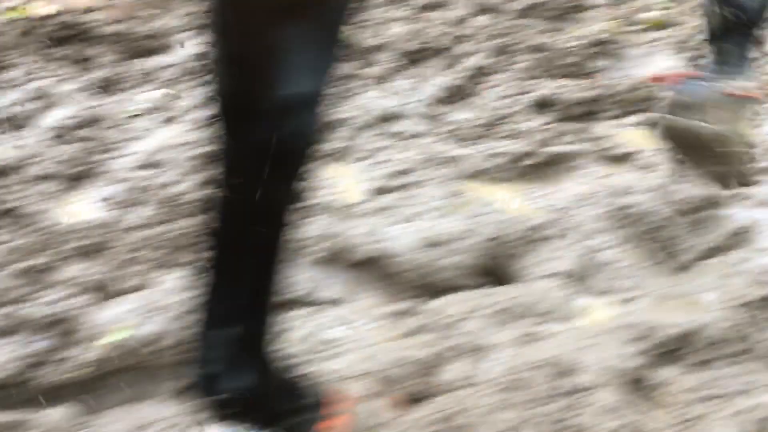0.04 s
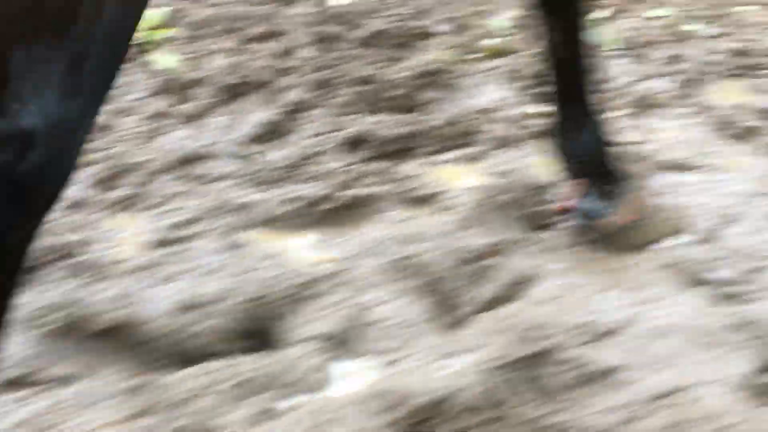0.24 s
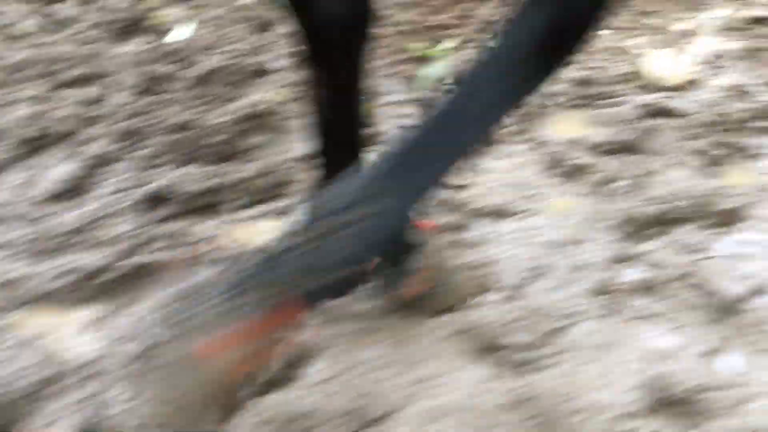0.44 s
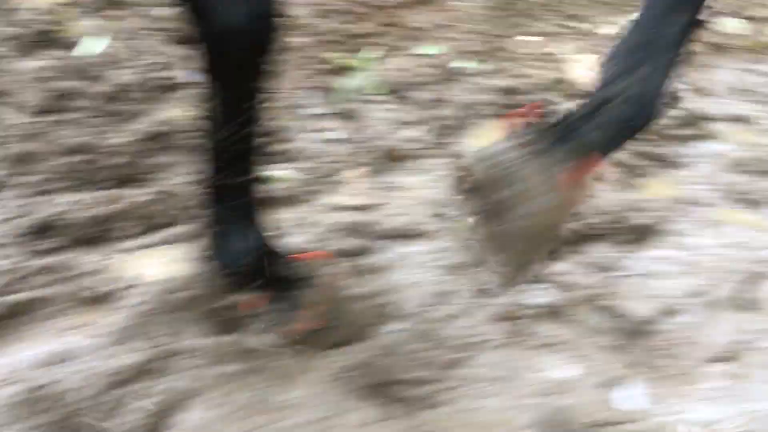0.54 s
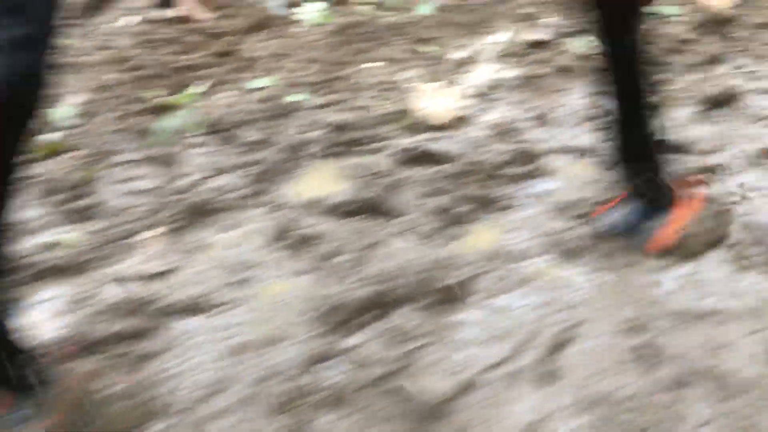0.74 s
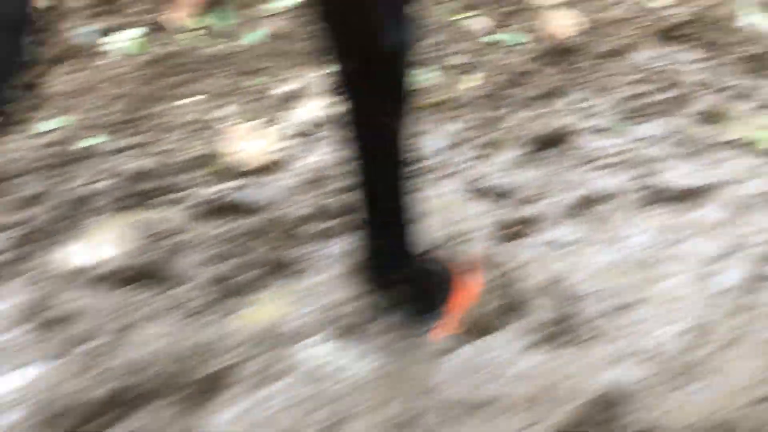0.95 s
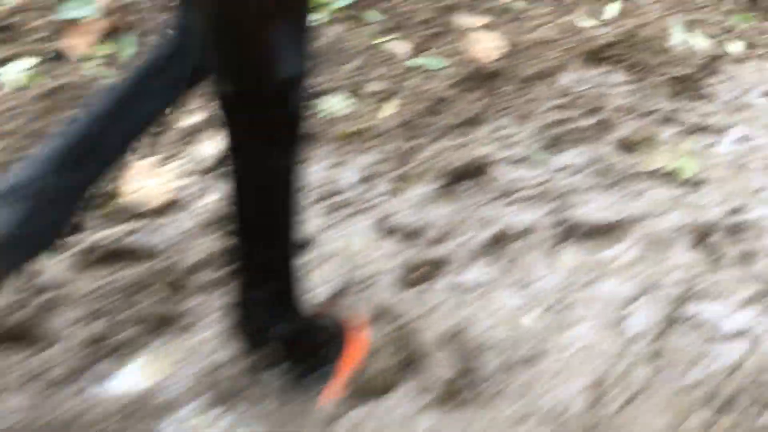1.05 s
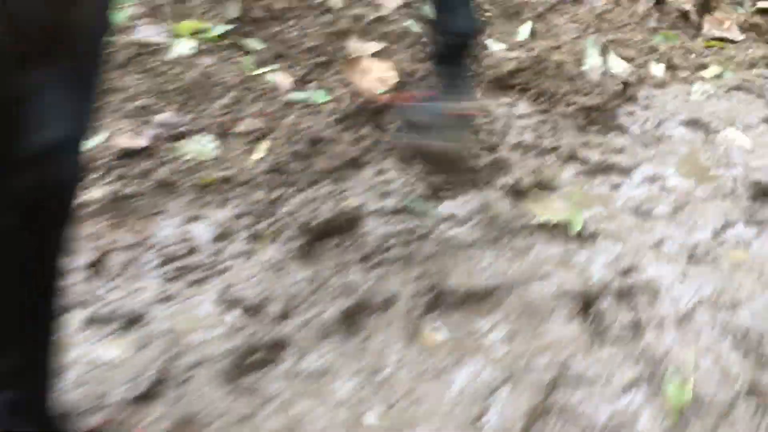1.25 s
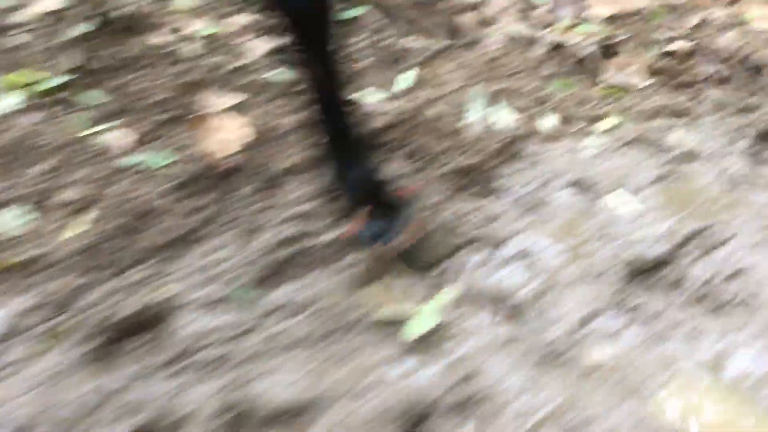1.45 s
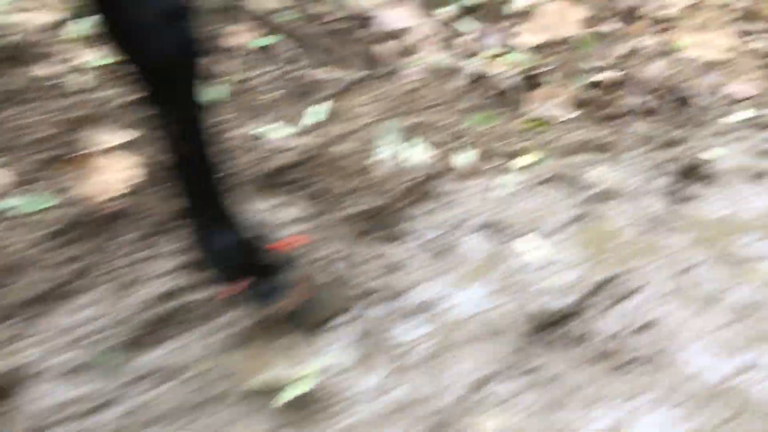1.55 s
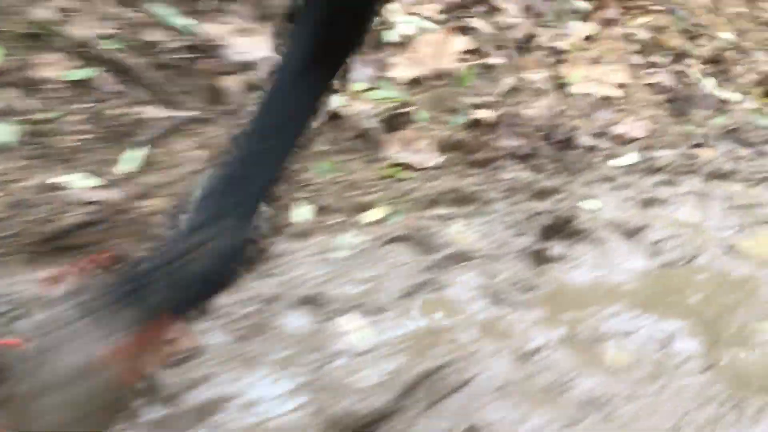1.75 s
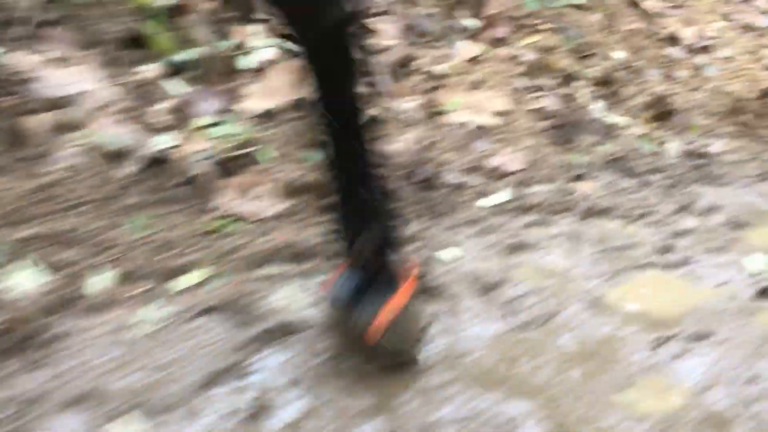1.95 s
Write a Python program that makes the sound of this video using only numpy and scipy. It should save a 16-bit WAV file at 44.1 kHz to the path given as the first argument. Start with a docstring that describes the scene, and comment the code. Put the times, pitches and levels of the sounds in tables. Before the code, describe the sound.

Horse hooves step through deep wet mud close to the microphone. Each step lands with a dull thud and a squelch, followed by bubbly pops and ticking droplets, over a soft outdoor hiss and faint wind.

```python
"""A horse walks through deep wet mud, outdoors, close to the microphone.
Each hoof thuds into the ground and squeezes out bubbling mud and a fine spray; air pockets ring,
and pop in a quick string as a hoof pulls free. Droplets tick and the mud patters as it settles.
Behind it lie a soft open-air hiss and faint wind on the microphone."""
import sys
import numpy as np
from scipy import signal
from scipy.fft import rfft, irfft
from scipy.io import wavfile

SR = 44100
rng = np.random.default_rng(int(sys.argv[2]) if len(sys.argv) > 2 else 0)


def unload_audio(sound):
    """Save the sound as a 16-bit wav file, at the path given as the first command line argument."""
    columns = np.transpose(np.atleast_2d(sound))
    # keep every value between -1 and 1, then stretch to whole-number steps
    steps = np.round(np.clip(columns, -1, 1) * 32767)
    wavfile.write(sys.argv[1], SR, steps.astype(np.int16))


N = 88200
T = np.arange(N) / SR
SHORT = 2 ** 15  # samples in one event
SPURT_HZ = 110  # how fast the flow of squeezed mud and water flickers


def amp(db):
    """Decibels to gain."""
    return 10 ** (np.asarray(db) / 20)


def unit(x, weight=None):
    """Scales to rms 1, optionally weighted over time."""
    return x / np.sqrt(np.average(x ** 2, weights=weight) + 1e-20)


def add(mix, start, sound):
    """Mixes a sound in at a start time in seconds."""
    part = mix[max(round(start * SR), 0):][:len(sound)]
    part += sound[:len(part)]


def colour(x, points):
    """Minimum-phase filter through (Hz, dB) points; the result has rms 1."""
    hz, db = np.transpose(points)
    f = abs(np.fft.fftfreq(4096, 1 / SR))
    log_gain = np.log(amp(np.interp(np.log(f + 1), np.log(hz), db)))
    taps = np.fft.ifft(np.exp(np.conj(signal.hilbert(log_gain)))).real
    return unit(signal.fftconvolve(x, taps[:len(taps) // 2])[:N])


def band(hz, width_hz, size=N):
    """Noise ringing in one resonance; at 0 Hz, a random wobble."""
    f = np.fft.rfftfreq(size, 1 / SR)
    return unit(irfft(rfft(rng.standard_normal(size)) / (1 + ((f - hz) / width_hz) ** 2), size))


def envelope(rise, hold=0, *, t60):
    """Swell, hold and exponential release, all in seconds."""
    t = T[:SHORT]
    swell = np.minimum(t / rise, 1) ** 1.57
    decay = np.log(1000) * np.maximum(t - rise - hold, 0) / t60
    return swell * np.exp(-np.minimum(decay, 20))


def shaped(x, env, start=0):
    """Puts an envelope on a texture from a given time on, with rms 1 at its top."""
    return env * unit(np.roll(x, -round(start * SR))[:len(env)], env ** 2)


def bubbles(per_s, lo_hz, hi_hz, cycles, spread_db, glide=0.041, sizes=30):
    """Tiny bubbles of many sizes bursting at random, each a short rising ring."""
    out = np.zeros(N)
    for hz in np.geomspace(lo_hz, hi_hz, sizes):
        turns = hz * rng.uniform(.96, 1.04) * T[:round(4 * cycles * SR / hz)]
        age = turns / cycles
        ring = hz * np.exp(-2 * age) * np.sin(2 * np.pi * turns * (1 + glide * np.minimum(age, 2)))
        when, chance, side = rng.random((4000, 3))[:round(per_s / sizes * N / SR)].T
        strength = amp(spread_db * np.minimum(-np.log(chance), 4)) * np.sign(side - .5)
        at = (when * N).astype(int)[:, None] + np.arange(len(ring))
        out += np.bincount(at.ravel(), np.outer(strength, ring).ravel(), N)[:N]
    return out


def open_air():
    """Outdoor hiss and lumpy wind on the microphone."""
    # Spectra of the air and the wind. Each row: frequency in Hz, relative level in dB.
    air_spectrum = [(88, -32.5), (170, 0.5), (430, -7), (1400, -12), (6000, -17), (15500, -22)]
    wind_spectrum = [(15, -16), (35, -4), (65, 0), (100, -4), (350, -17), (8000, -55)]
    air = colour(rng.standard_normal(N), air_spectrum)
    wind = colour(rng.standard_normal(N), wind_spectrum)
    gusts = amp(2.2 * band(0, width_hz=17))
    return amp(-47) * air + amp(-51.5) * unit(wind * gusts)


def settling_mud():
    """Small bubbles patter and fizz in the mud all around."""
    # Tone of the patter. Each row: frequency in Hz, relative gain in dB.
    patter_tone = [(400, -16), (900, -2), (2000, -3.5), (4500, -10), (6000, -4.5), (10000, -23)]
    patter = colour(bubbles(per_s=3000, lo_hz=421, hi_hz=7920, cycles=6.2, spread_db=3.5), patter_tone)
    fizz = unit(bubbles(per_s=1300, lo_hz=8230, hi_hz=14900, cycles=25, spread_db=3.5, sizes=12))
    return amp(-49.5) * patter + amp(-52.5) * fizz


def surroundings(x):
    """Adds faint scatter from the ground, the horse and the bank to the direct sound."""
    tail = rng.standard_normal(SHORT) * envelope(rise=0.012, t60=0.13)
    return x + amp(-16) * signal.fftconvolve(x, tail / np.linalg.norm(tail))[:N]


def pip():
    """A tiny bubble whistles one thin high note."""
    # The whistle. Each row: start in seconds, level in dB, pitch in Hz.
    whistles = [(0.861, -28.5, 12370)]
    out = np.zeros(N)
    for start, db, hz in whistles:
        note = shaped(band(hz, width_hz=190, size=SHORT), envelope(rise=0.0028, t60=.035))
        add(out, start, amp(db) * note)
    return out


def drops():
    """Droplets and bursting films of water give short bright ticks."""
    # The ticks. Each row: time of the peak in seconds, level in dB, pitch in Hz.
    ticks = [(0.064, -32.5, 11600), (.157, -32.5, 13500), (0.237, -21, 5870), (0.2698, -18, 14100),
             (0.313, -27.5, 9900), (.493, -20.5, 13200), (.536, -32, 5100), (.594, -36.5, 5000),
             (0.781, -26.5, 9100), (0.82, -27, 12000), (1.354, -30.5, 15100), (1.426, -16, 12900),
             (1.439, -18.5, 4930)]
    rise = 0.000997
    out = np.zeros(N)
    for peak, db, hz in ticks:
        tick = shaped(band(hz, width_hz=0.25 * hz, size=SHORT), envelope(rise, t60=0.016))
        add(out, peak - rise, amp(db) * tick)
    return out


def mud_texture():
    """The wet crackle of mud under pressure."""
    # Tone of the mud. Each row: frequency in Hz, relative gain in dB.
    mud_tone = [(100, -35.5), (350, -8.5), (600, -5.5), (1100, 0.5), (1700, -2), (2400, -5), (3400, -10),
                (5000, -19), (9000, -17), (16000, -1)]
    return colour(bubbles(per_s=2600, lo_hz=347, hi_hz=7470, cycles=7.5, spread_db=1.5), mud_tone)


def pops():
    """Air breaks into the hollow under a hoof: two rising rings and a wet snap."""
    # Air pops. Each row: start in seconds, level in dB, low and high cavity pitch in Hz.
    cavities = [(.007, -36, 600, 685), (.056, -38.5, 522, 520), (.4755, -20, 960, 975),
                (.509, -32, 900, 940), (.822, -34.5, 1600, 1610), (0.9321, -25.5, 1630, 2900),
                (0.948, -27, 760, 1560), (.967, -20.5, 803, 2790), (.982, -21.5, 804, 1645),
                (1.003, -20.5, 667, 1410), (1.1847, -30.5, 2670, 5750), (1.309, -31.5, 1530, 1882),
                (1.472, -28.5, 2350, 2770), (1.539, -29, 834, 950), (1.5555, -20, 1370, 1596),
                (1.571, -28.5, 1170, 2280), (1.603, -22, 528, 1244), (1.679, -30, 822, 910),
                (1.744, -32.5, 1070, 2090)]
    rise, glide_per_s = 0.00065, 4.2
    out, mud, t = np.zeros(N), mud_texture(), T[:SHORT]
    rising_clock = t + glide_per_s * t ** 2 / 2
    for start, db, low_hz, high_hz in cavities:
        rings = sum(np.sin(2 * np.pi * hz * rising_clock) * envelope(rise, t60=0.033 * np.sqrt(1000 / hz))
                    for hz in (low_hz, high_hz))
        top_hz = min(6 * high_hz, SR / 3)  # a larger hollow gives a duller snap
        hollow = signal.butter(2, [min(low_hz, high_hz), top_hz], "bandpass", fs=SR, output="sos")
        snap = shaped(signal.sosfilt(hollow, mud), envelope(rise, t60=0.057), start)
        add(out, start, amp(db) * (rings + amp(-4.5) * snap))
    return out


def squirt():
    """Water sputters out through a gap whose two resonances rise as the hoof's weight closes it."""
    # Timing of the squirt: start, swell, hold and 60 dB decay time, all in seconds.
    timing = (1.108, .022, 0.022, 0.25)
    # Resonances of the gap. Each row: multiple of the pitch, level in dB.
    gap_modes = [(1.002, -30.5), (2.15, -36)]
    start, swell, hold, t60 = timing
    pitch_hz = 2675 * (1 - .35 * np.exp(-T[:SHORT] / swell))
    turns = np.cumsum(pitch_hz) / SR
    gap = sum(amp(db) * band(0, width_hz=250 * ratio, size=SHORT) * np.sin(2 * np.pi * ratio * turns)
              for ratio, db in gap_modes)
    sputter = unit(amp(4.5 * band(0, SPURT_HZ, size=SHORT)))
    out = np.zeros(N)
    add(out, start, gap * sputter * envelope(swell, hold, t60=t60))
    return out


def hoof_strikes():
    """The hoof meets firm ground under the mud and rings briefly."""
    # Hard contacts. Each row: start in seconds, level in dB.
    strikes = [(.4703, -16), (1.0842, -16), (1.0932, -35.5)]
    # Resonances of the hoof. Each row: frequency in Hz, relative level in dB.
    hoof_modes = [(1030, -1.5), (1350, -4), (2000, -6.5), (2240, -1.5), (2860, -7.5)]
    tones = sum(amp(db) * np.sin(2 * np.pi * (hz * T[:SHORT] + rng.random())) for hz, db in hoof_modes)
    ring = tones * envelope(rise=.001, t60=.045)
    out = np.zeros(N)
    for start, db in strikes:
        add(out, start, amp(db) * ring)
    return out


def thuds():
    """The horse's weight lands: a damped knock that sags in pitch, a dull slap and a ground shudder."""
    # Landings. Each row: start in seconds, pitch in Hz, level in dB, 60 dB decay time in seconds,
    # level of the shudder in dB.
    landings = [(0.057, 220, -39, 0.026, -46), (0.318, 145.7, -34, 0.18, -38),
                (0.471, 180, -21, 0.023, -33), (0.604, 134, -45, 0.44, -41.5), (1.02, 157, -39, 0.21, -47),
                (1.087, 232, -19.5, 0.02, -33.5), (1.572, 187, -32, 0.014, -39),
                (1.601, 257, -32, 0.022, -38), (1.695, 216.6, -22, 0.04, -32),
                (1.797, 154, -36, 0.068, -42)]
    rise, sag = 0.0041, 0.17
    out = np.zeros(N)
    for start, hz, db, t60, ground_db in landings:
        env = envelope(rise, t60=t60)
        pitch_hz = hz * (1 + sag * (np.exp(-2 * T[:SHORT] / t60) - .5))
        knock = np.sqrt(2) * env * np.sin(2 * np.pi * np.cumsum(pitch_hz) / SR)
        slap = amp(-6) * shaped(band(hz=362, width_hz=240, size=SHORT), env)
        shudder = shaped(band(hz=79, width_hz=32, size=SHORT), envelope(2 * rise, t60=.13))
        add(out, start, amp(db) * (knock + slap) + amp(ground_db) * shudder)
    return out


def squelches():
    """Each squeeze drives out bubbling mud, spray and droplets, and rings a wavering air pocket."""
    # Squeezes under the hooves. Each row: start, swell, hold and the mud's 60 dB decay time in seconds,
    # mud and spray levels in dB, air pocket pitch in Hz, air pocket level in dB.
    squeezes = [ (0.0, 0.0015, 0.066, 0.2, -49, -50, 1150, -56),
                (0.225, 0.011, 0.025, 0.12, -37.5, -29.5, 967, -34.5),
                (0.308, 0.0097, 0.088, 1, -40.5, -40, 1370, -70),
                (0.347, 0.0049, 0.0077, 0.018, -30.5, -30, 2737, -31.5),
                (0.465, 0.0049, 0.011, 0.022, -24.5, -20, 1115, -50),
                (0.493, .004, 0.011, 0.027, -40, -39, 1020, -47),
                (0.601, 0.0041, 0.0039, 0.2, -50, -44.5, 710, -47),
                (0.775, 0.0053, 0.022, 1, -38, -36, 830, -44),
                (1.025, 0.0047, 0.0082, 0.024, -37, -37.5, 2270, -32.5),
                (1.066, 0.026, 0.0037, 0.044, -22.5, -20, 549, -27.5),
                (1.11, 0.011, 0.0068, 0.29, -36, -39, 1300, -32.5),
                (1.182, 0.089, 0.0068, 0.21, -43, -67, 1710, -59),
                (1.382, 0.0075, 0.024, 0.2, -77, -41.5, 1200, -62),
                (1.423, 0.0042, 0.021, 0.045, -28, -24.5, 913, -29.5),
                (1.526, 0.044, 0.0066, 0.043, -27.5, -30.5, 1600, -41),
                (1.588, 0.0054, 0.012, 0.045, -29.5, -26, 1450, -32.5),
                (1.622, 0.0098, 0.0061, 0.12, -39, -41, 1330, -40),
                (1.668, 0.021, 0.0055, 0.15, -31, -23, 870, -31),
                (1.692, 0.009, 0.021, 0.11, -32, -56, 915, -28),
                (1.790, 0.015, 0.0074, 0.054, -40.5, -37, 781, -48), ]
    # Tone of the spray and its droplets. Each row: frequency in Hz, relative gain in dB.
    spray_tone = [(500, -56), (2000, -2.5), (3800, 0), (4800, -5), (5800, 1), (7000, -3.5), (9000, 1),
                  (10500, -3), (12500, 3.5), (16000, 1)]
    mist_above_hz, waver_hz = 8200, 117
    spurts = amp(1.7 * band(0, SPURT_HZ))
    mud = spurts * mud_texture()
    specks = bubbles(per_s=5000, lo_hz=2340, hi_hz=13300, cycles=1.17, spread_db=1.5, sizes=16)
    spray = spurts * colour(specks, spray_tone)
    spatter = colour(bubbles(per_s=270, lo_hz=3000, hi_hz=13000, cycles=6, spread_db=2.5), spray_tone)
    coarse = signal.sosfiltfilt(signal.butter(3, mist_above_hz, fs=SR, output="sos"), spray)
    mist = spray - coarse
    wavering_clock = np.cumsum(1 + 0.0466 * band(0, waver_hz)) / SR
    flutter = amp(5.5 * band(0, waver_hz))
    out = np.zeros(N)
    for start, swell, hold, t60, mud_db, spray_db, pocket_hz, pocket_db in squeezes:
        pocket = flutter * np.sin(2 * np.pi * pocket_hz * wavering_clock)
        layers = ((mud, amp(mud_db), t60),
                  (coarse, amp(spray_db) * np.std(coarse), t60),
                  (mist, amp(spray_db) * np.std(mist), t60 / 1.1),
                  (pocket, amp(pocket_db), t60 / 2.2))
        for texture, gain, fade in layers:
            add(out, start, gain * shaped(texture, envelope(swell, hold, t60=fade), start))
        # Thrown droplets fall back, quieter than the spray.
        falling = np.roll(spatter, -round(start * SR))[:SHORT] * envelope(swell, hold, t60=.17)
        add(out, start, amp(spray_db - 10) * falling)
    return out


def scene():
    """Hooves in mud close by, over the outdoor background, in mono."""
    hooves = squelches() + thuds() + hoof_strikes() + squirt() + pops() + drops() + pip()
    return (surroundings(hooves) + settling_mud() + open_air())[None]


def record(dry):
    """The microphone's bass cut and the recorder's band limit."""
    low_cut_hz, top_hz = 28, 16000
    thin = signal.sosfilt(signal.butter(2, low_cut_hz, "highpass", fs=SR, output="sos"), dry)
    band_limit = signal.firwin(511, top_hz, window=("kaiser", 9), fs=SR)
    return signal.oaconvolve(thin, band_limit[None], "same")


dry = scene()
out = record(dry)
unload_audio(out)
```